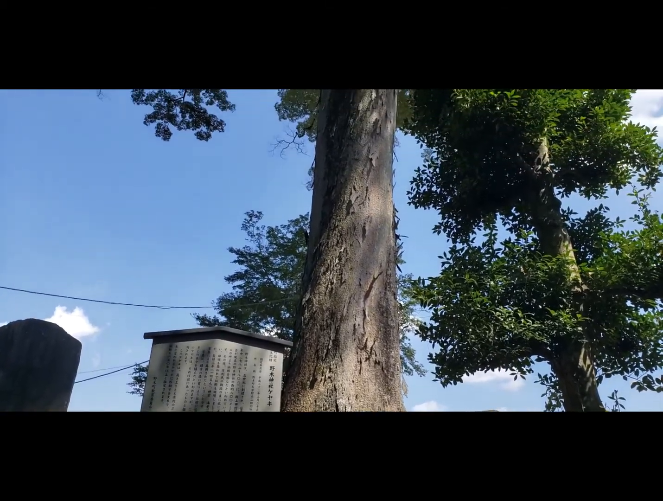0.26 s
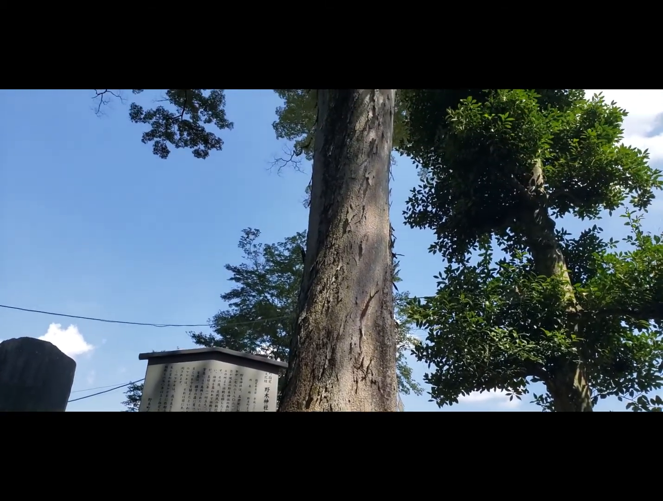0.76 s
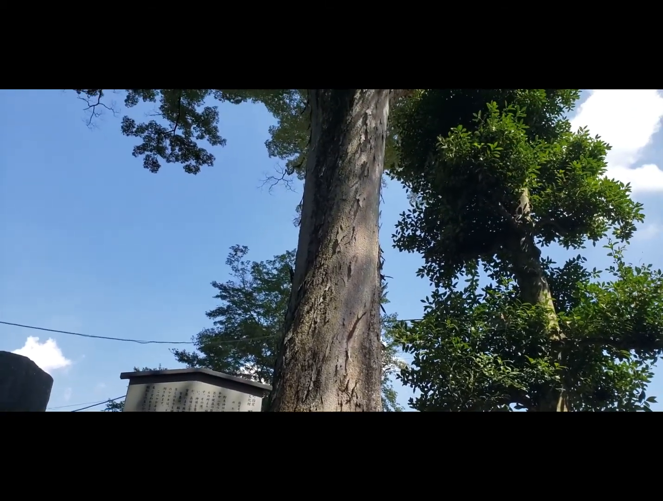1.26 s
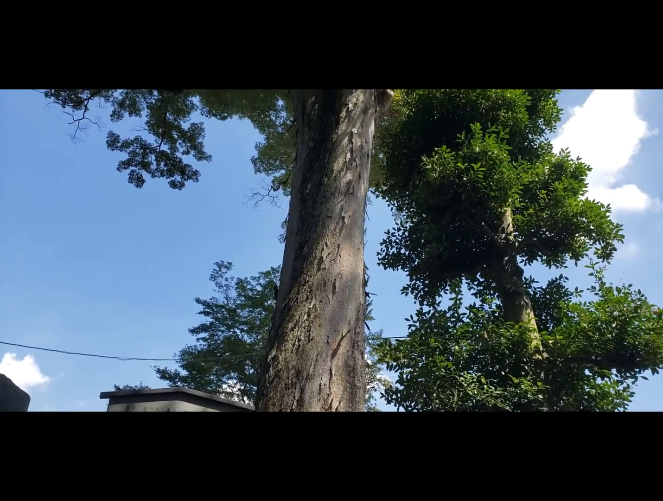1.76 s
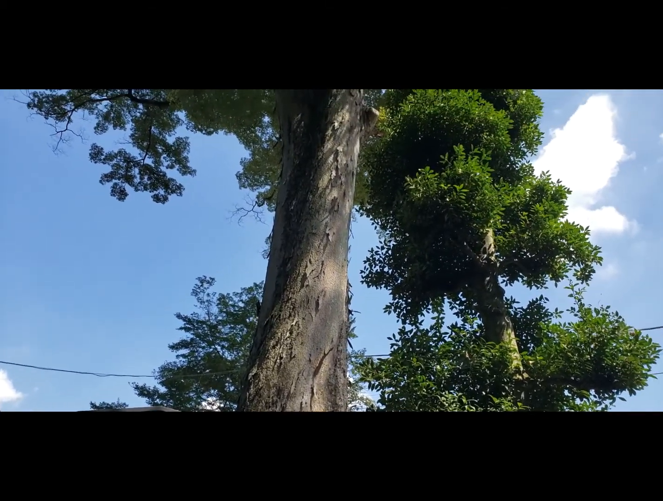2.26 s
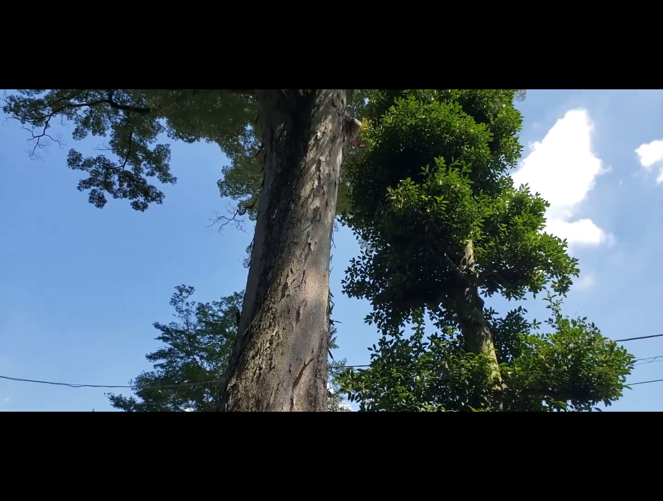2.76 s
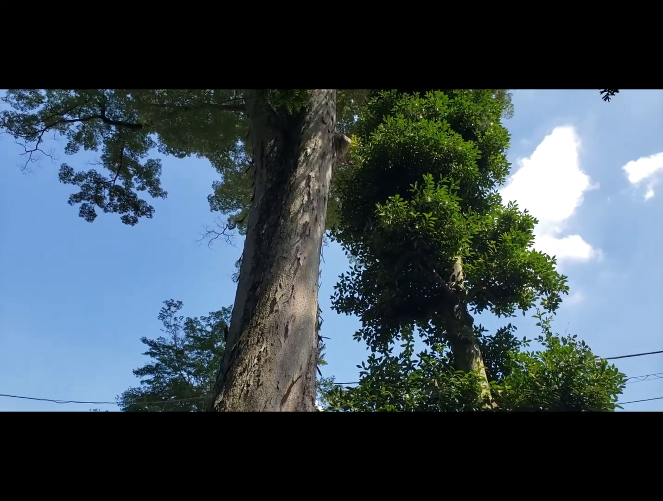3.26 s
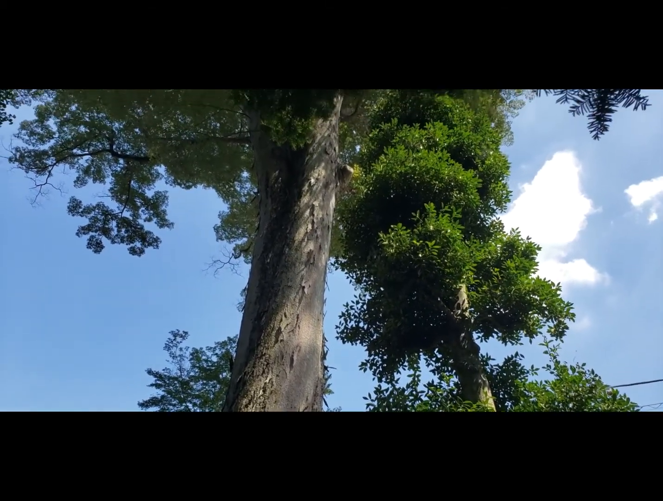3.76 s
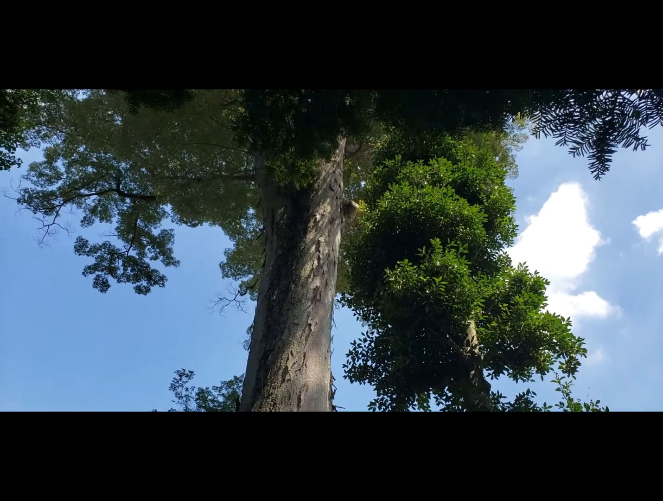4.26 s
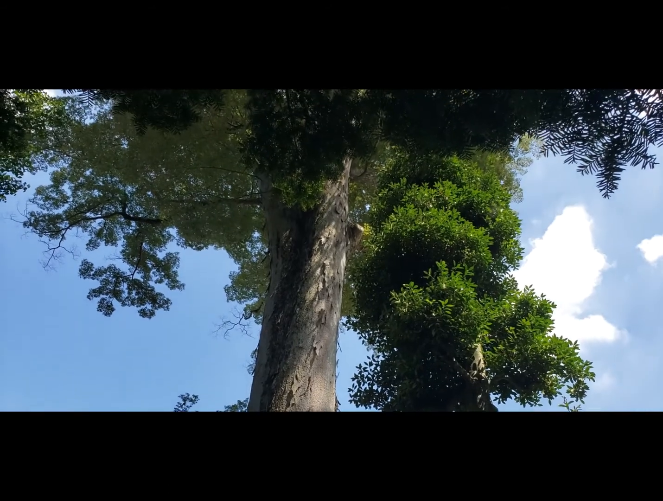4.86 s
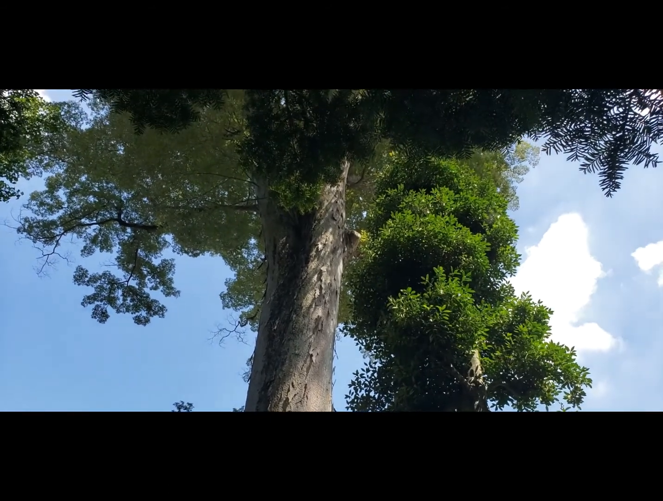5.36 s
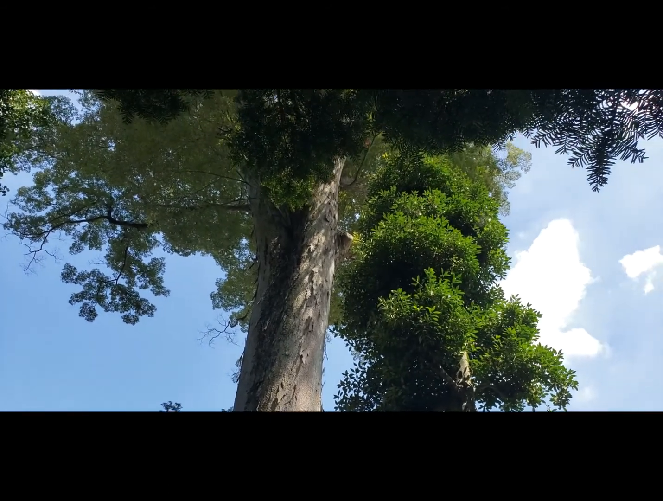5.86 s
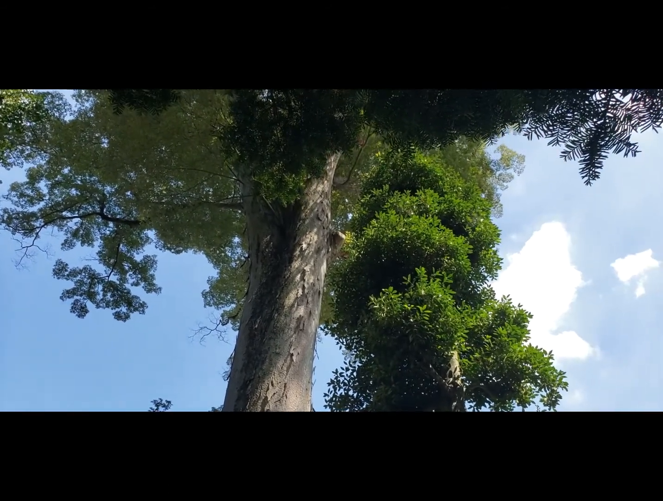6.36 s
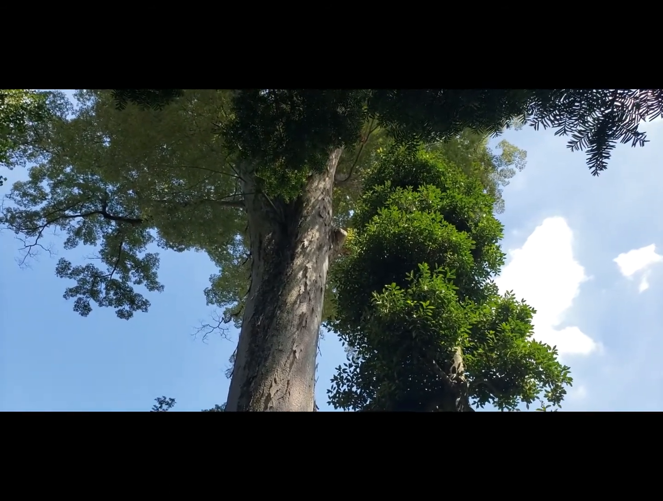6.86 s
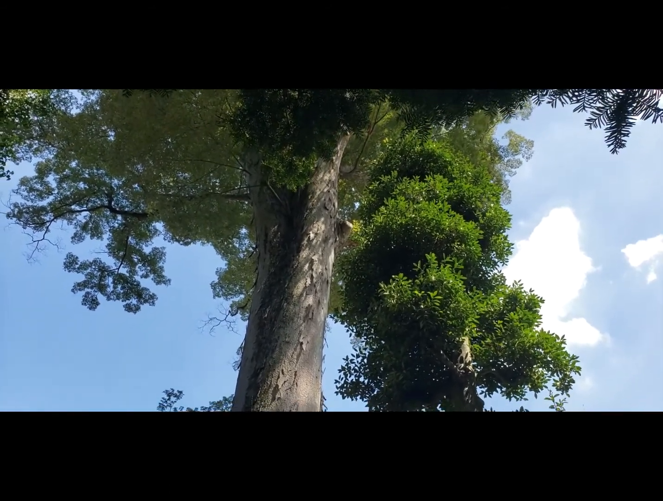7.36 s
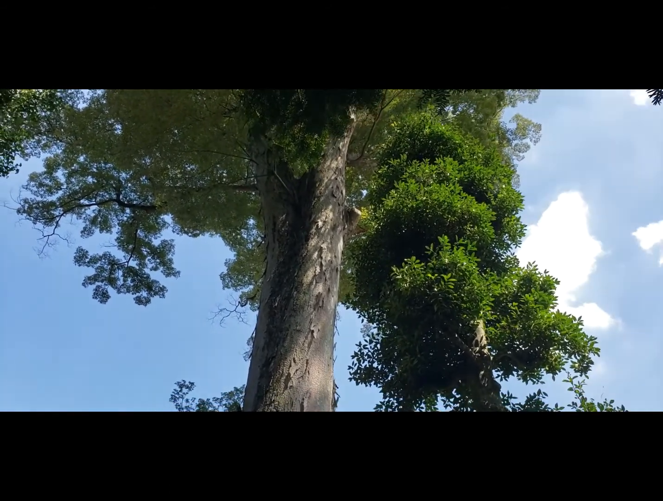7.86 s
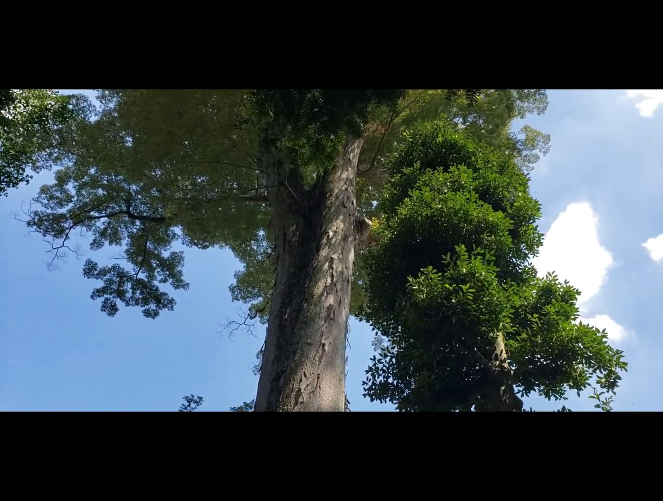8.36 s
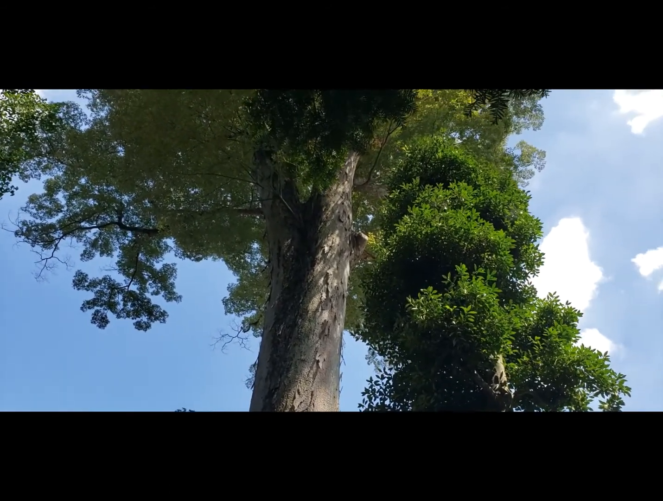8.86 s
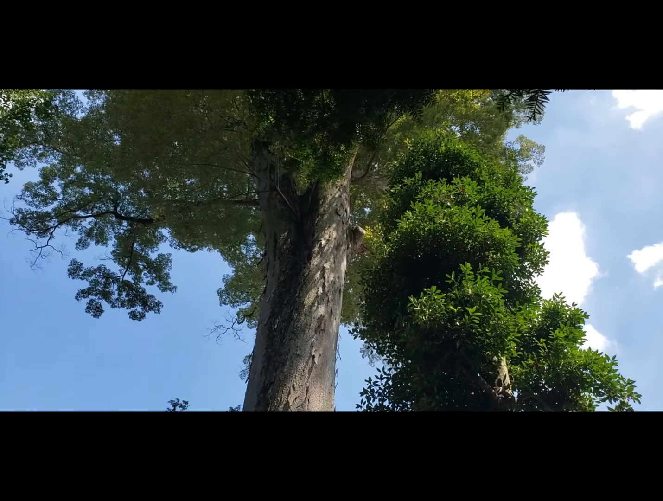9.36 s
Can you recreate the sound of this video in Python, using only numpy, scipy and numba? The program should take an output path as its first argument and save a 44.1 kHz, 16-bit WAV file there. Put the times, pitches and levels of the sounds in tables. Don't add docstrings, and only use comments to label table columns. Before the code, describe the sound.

Outdoors under a tall tree, a steady, bright chorus of countless cicadas surrounds a hand-held phone. High up to the right, one singer starts faintly and builds into a shrill, fast-pulsing buzz. Far away a hammer strikes a steel pipe five times, about once a second, thudding and ringing with echoes. Soft traffic hum and passing cars lie beneath; a light hollow knock and two fainter hammer blows come late.

```python
import sys
import numpy as np
from scipy import signal
from scipy.fft import rfft, irfft
from scipy.io import wavfile
from scipy.ndimage import uniform_filter1d
from numba import njit

SR = 44100
rng = np.random.default_rng(int(sys.argv[2]) if len(sys.argv) > 2 else 0)


def natural_amplitude(level_db):
    exponent = np.asarray(level_db, float) / 20
    return 10 ** exponent


def store_pcm(level_fs):
    pcm = np.round(np.clip(level_fs, -1, 1) * 32767).astype(np.int16)
    wavfile.write(sys.argv[1], SR, np.atleast_2d(pcm).T)


N = 423360
T = np.arange(N) / SR
F = np.fft.rfftfreq(N, 1 / SR)


def unit(x):
    return x / np.sqrt(np.mean(x ** 2))


def curves(table):
    s, *columns = np.transpose(table)
    return [np.interp(T, s, column) for column in columns]


def between(ends, share):
    return ends[0] + (ends[1] - ends[0]) * share


def walk(rate):
    hold = int(SR / rate)
    held = np.repeat(rng.standard_normal(N // hold + 1), hold)
    return 1.46 * uniform_filter1d(uniform_filter1d(held, hold), hold)[:N]


def within(x, lo_hz, hi_hz):
    return signal.sosfilt(signal.butter(6, [lo_hz, hi_hz], "band", fs=SR, output="sos"), x)


@njit
def svf(x, hz, width):
    y, band, low = np.empty(len(x)), 0., 0.
    for i in range(len(x)):
        g, damping = np.tan(np.pi * hz[i] / SR), width / hz[i]
        v = (band + g * (x[i] - low)) / (1 + g * (g + damping))
        band, low, y[i] = 2 * v - band, low + 2 * g * v, damping * v
    return y


def steep(x, hz, width_hz):
    hz = np.clip(hz + 0 * T, 20, .42 * SR)
    return svf(svf(x, hz, 1. * width_hz), hz, 1. * width_hz)


def ports(x, lag, pan_db=0):
    late = irfft(rfft(x) * np.exp(-2j * np.pi * F * lag / SR), N)
    return np.array([late * natural_amplitude(pan_db / 2), x * natural_amplitude(-pan_db / 2)])


def diffuse(size):
    spacing_m, sound_m_per_s = 0.157, 343
    like = .93 * np.sinc(2 * np.fft.rfftfreq(size, 1 / SR) * spacing_m / sound_m_per_s)
    mid, side = rfft(rng.standard_normal((2, size)))
    return np.sqrt((1 + like) / 2) * mid + np.sqrt((1 - like) / 2) * side * np.array([[1], [-1]])


def bed(spectrum, swell_db, flicker_db, rate):
    hz, db = np.transpose(spectrum)
    octave = np.log2(np.maximum(F, 1))
    noise = diffuse(N) * natural_amplitude(np.interp(octave, np.log2(hz), db))
    out, swell, spacing = 0, walk(0.78), .4
    for centre in np.arange(np.log2(hz[0]), np.log2(hz[-1]) + spacing, spacing):
        band = irfft(noise * np.clip(1 - abs(octave - centre) / spacing, 0, 1), N)
        out = out + band * natural_amplitude(swell_db * swell + flicker_db * walk(rate))
    return unit(out)


def scatter(x, t60, rise, size):
    t = np.arange(size) / SR
    tail = irfft(diffuse(size), size) * (1 - np.exp(-t / rise)) * natural_amplitude(-60 * t / t60)
    tail = tail / np.sqrt(np.sum(tail ** 2) / 2)
    return signal.fftconvolve(x[None], tail, axes=1)[:, :N]


def far_chorus():
    # pitch_hz, level_db [dB per Hz]
    chorus_spectrum = [(1710, -49), (2900, -42), (3590, -24), (4250, -0.5), (4690, 2.5), (5070, 2),
                       (5340, 5), (5510, 6.5), (6540, -4.5), (7330, -8.5), (8300, -13), (8790, -21),
                       (10000, -25.5), (13000, -47), (22000, -120)]
    level_db = between((-45.5, -49), T / T[-1]) + 1.5
    start_db = -4 * np.exp(-T / .2)
    return bed(chorus_spectrum, swell_db=.5, flicker_db=1.6, rate=16) * natural_amplitude(level_db + start_db)


def canopy():
    # pitch_hz, level_db [dB per Hz]
    canopy_spectrum = [(10000, -11.5), (10700, -4), (11200, 2), (11800, -12.5), (12600, -5), (14000, -3),
                       (15500, -3.5), (16000, -8)]
    level_db = between((-46.5, -50), T / T[-1])
    return bed(canopy_spectrum, swell_db=.4, flicker_db=1.2, rate=17) * natural_amplitude(level_db)


def drone():
    # lower_hz, upper_hz
    group_hz = [
        (1750., 2280),
        (2350., 2850.),
        (3400., 4660),
    ]
    # first_db, last_db
    group_db = [
        (-70.5, -82),
        (-76, -64),
        (-62.5, -65.5),
    ]
    out = 0
    for (lo_hz, hi_hz), ends in zip(group_hz, group_db):
        group = unit(within(irfft(diffuse(N), N), lo_hz, hi_hz))
        patchy_db = 1.5 * walk(2.5) + 2.2 * walk(14)
        out = out + group * natural_amplitude(between(ends, T / T[-1]) + patchy_db)
    return out


def town():
    # pitch_hz, level_db [dB per Hz]
    town_spectrum = [(13, -48), (22, -17), (35, -2), (60, 2.5), (97, -6), (129, -4.5), (188, -16.5),
                     (298, -20), (544, -30), (1640, -33.5), (2440, -30), (3200, -25.5), (4160, -81),
                     (7040, -120)]
    # time_s, level_db
    flow = [(0, -60), (1.3, -57.5), (2.6, -55.5), (3.3, -57), (3.85, -55), (4.25, -58.5), (4.7, -55),
            (6.2, -55), (7.2, -59), (8.4, -56), (9.6, -61)]
    return bed(town_spectrum, swell_db=.8, flicker_db=2.2, rate=5) * natural_amplitude(curves(flow)[0] + 2.5)


def rumble():
    # peak_s, level_db, span_s [time to lose 10 dB]
    rumble_swells = [
        (1.6, -68, .9),
        (2.6, -70, .7),
        (4.62, -60, .15),
        (6.6, -67, .6),
        (8.6, -73, .2),
    ]
    near = sum(natural_amplitude(db - 10 * abs(T - s) / span_s) for s, db, span_s in rumble_swells)
    return unit(within(irfft(diffuse(N), N), 180.0, 378.0)) * near * natural_amplitude(-9)


def pumping(strength_db, stretch):
    lifts_s = [0.31, 1.052, 1.768, 2.503, 3.243, 4.003, 4.779, 5.554, 6.323, 7.076, 7.823, 8.554, 9.293,
               10.03]
    # time_s, loss_db
    falters = [(1.95, -9), (2.07, -8), (3.56, -5), (3.69, -9), (3.81, -5), (3.875, -12), (4.2, -3),
               (4.267, -13), (4.39, -3), (8.79, -4)]
    turn = np.interp(T, lifts_s, 12 * np.arange(len(lifts_s)))
    top_s = np.interp(np.arange(int(turn[-1]) + 2), turn[turn > 0], T[turn > 0])
    uneven_db = between((3.0, 1.3), np.interp(top_s, T, stretch))
    db = np.interp(top_s, T, strength_db) + uneven_db * rng.standard_normal(len(top_s))
    for at, loss_db in falters:
        db[np.argmin(abs(top_s - at))] = np.interp(at, T, strength_db) + loss_db
    side = turn - np.round(turn)
    lift = np.exp(-.5 * (side / np.where(side < 0, .18, .11)) ** 2) * (T > lifts_s[0])
    return lift, uniform_filter1d(db[np.round(turn).astype(int)], size=500)


def clicks(rate, jitter, scatter_db, weak_db):
    turns = np.cumsum(rate) / SR
    k = np.arange(1, int(turns[-1]) - 1)
    chance = rng.standard_normal((len(k), 2))
    at = np.interp(k + jitter * chance[:, 0], turns, np.arange(N))
    size = (-1.) ** k * natural_amplitude(scatter_db * chance[:, 1] + weak_db * (k % 2))
    near = at.astype(int)[:, None] + np.arange(-8, 9)
    gap = near - at[:, None]
    out = np.zeros(N + 16)
    np.add.at(out, near.clip(0), size[:, None] * np.sinc(gap) * np.cos(np.pi * gap / 18) ** 2)
    return out[:N]


def cicada():
    # time_s, lift_db, belly_db, stretch [0-1]
    song = [(0, -52, -60, 0), (0.8, -48.5, -53, .05), (1.7, -44, -47, .13), (2.4, -39, -46, .26),
            (3.1, -43, -46, .4), (3.7, -33, -46, .6), (4.3, -32, -46, .78), (4.6, -28.5, -42, .84),
            (5.15, -26.5, -41.5, .87), (5.8, -30, -40, .9), (6.2, -31, -39, .93), (6.6, -28, -37.5, .95),
            (6.9, -29.5, -39, .98), (7.4, -29, -38, 1), (8.05, -35, -36.5, 1), (8.6, -24.5, -37.5, 1),
            (8.92, -23, -38, 1), (9.35, -30, -40.5, 1)]
    # time_s, rate_hz
    click_rate = [(0, 391), (3, 393), (5.3, 392), (5.9, 389), (6.5, 383), (7.5, 385.3), (8, 386.5),
                  (9.6, 386.8)]
    rest_hz, belly_hz = 11200, 5450
    strength_db, belly_db, stretch = curves(song)
    half_db = between((-80, -50), stretch)
    leaf_db = between((-52, -37.5), stretch)
    pan_db = between((-4, -4.5), stretch)
    reach_hz = between((11600, 14850), stretch)
    lift, peak_db = pumping(strength_db, stretch)

    top_hz = reach_hz + 80 * (peak_db - uniform_filter1d(peak_db, SR // 2))
    hz = rest_hz + (top_hz - rest_hz) * lift ** .6
    pace = curves(click_rate)[0] * (1 + .03 * lift ** 2)
    train = clicks(pace, jitter=.004, scatter_db=2.0, weak_db=-.8)
    ribs = clicks(pace, jitter=.02, scatter_db=1.0, weak_db=-0.5)
    ribs = ribs + 0.22 * clicks(pace, jitter=.3, scatter_db=3.0, weak_db=-1)

    shrill = unit(steep(ribs, hz, 3200)) + .5 * unit(steep(ribs, hz - 1300, 1800))
    shrill = within(shrill, 10900., 17000.)
    half = unit(steep(ribs, 0.518 * hz, 1150)) * natural_amplitude(half_db) * lift
    belly = unit(within(steep(train, belly_hz, 1700), 4600., 5950.))
    belly = belly * natural_amplitude(belly_db + 1.5) * (1 - .95 * lift ** .35)
    burst = shrill * natural_amplitude(peak_db - 3.0) * lift ** 1.2
    leaves = shrill * (0.5 + lift) * natural_amplitude(leaf_db)

    twigs = scatter(burst + half + .4 * belly, t60=.03, rise=.0005, size=4096) * natural_amplitude(-10.0)
    crown = scatter(leaves + 0.91 * half + 0.36 * belly, t60=0.15, rise=0.0027, size=16384)
    high = ports(.8 * burst + .3 * leaves, lag=18.9, pan_db=pan_db)
    low = ports(.8 * (half + belly), lag=16.5, pan_db=.6)
    return high + low + twigs + crown


def modes(table, size):
    t = np.arange(size) / SR
    ring = sum(natural_amplitude(db - 60 * t / t60) * np.sin(2 * np.pi * hz * t) for hz, db, t60 in table)
    return ring / abs(ring).max()


def hammer():
    # start_s, thud_db, ring_db [re thud], boom_db [re thud]
    blows = [
        (0.33, -42, -23.5, -5),
        (1.345, -32.5, -22, -7),
        (2.366, -31, -21.5, -11.5),
        (3.372, -30.5, -21.5, -6.5),
        (4.45, -32, -24, -10),
        (8.46, -44.5, -25, -13),
        (9.5, -42.5, -26, -8),
    ]
    # pitch_hz, level_db, t60_s
    post_modes = [(191.5, -15, 0.25), (222, -1, 0.1), (336.6, -2, 0.16), (372, 0, 0.11), (453, -9.5, 0.1),
                  (830, -11.5, 0.065), (930, -17.5, 0.091), (1077.3, -15.5, 0.074), (1150, -6, 0.061),
                  (1230, -16, 0.27), (1441, -23.5, 0.12), (2290, -18, 0.02)]
    pipe_modes = [(2384, -9, .35), (2393, -19, .5), (2838, 0, .3), (2846, -8, .6), (2966, -20, .3),
                  (3185, -6, .25), (3330, -15, .12)]
    ground_modes = [(62, -27, 0.18), (85.7, -3, 0.5), (109, -4, 0.13), (141, -3.5, 0.12), (166, -10, 0.047)]
    body, pipe = np.zeros((2, N + 2 * SR))
    thud, ring, boom = (modes(table, size=SR) for table in (post_modes, pipe_modes, ground_modes))
    ring = ring * (1 - np.exp(-(T[:SR] / .011) ** 2))
    for s, db, ring_db, boom_db in blows:
        crack = within(rng.standard_normal(SR), 228.0, 3230.0) * natural_amplitude(-1.5 - 60 * T[:SR] / 0.038)
        blow = natural_amplitude(db) * (natural_amplitude(3.5) * thud + crack + natural_amplitude(boom_db) * boom)
        body[int(s * SR):][:SR] += blow
        body[int((s - .018) * SR):][:SR] += blow * natural_amplitude(-17)
        pipe[int(s * SR):][:SR] += natural_amplitude(db + ring_db) * ring
        pipe[int((s + .095) * SR):][:SR] += natural_amplitude(db + ring_db + 1.5) * ring
    body, pipe = body[:N], pipe[:N]
    near = scatter(body, t60=0.49, rise=.012, size=16384)[0] * natural_amplitude(9.5) + pipe * natural_amplitude(30.5)
    yard = scatter(body + natural_amplitude(16.5) * pipe, t60=0.55, rise=0.0067, size=32768) * natural_amplitude(6.5)
    return ports(near, lag=7.1) + yard


def engines():
    # time_s, pitch_hz, level_db
    first_car = [(0.4, 162, -68), (1.1, 162, -59), (1.6, 161.3, -54), (2.4, 160.5, -64)]
    second_car = [(3.5, 100, -64), (4.4, 116, -60), (4.96, 125, -58), (5.6, 131, -57), (6.06, 131, -58),
                  (6.35, 125.5, -53), (6.84, 116.5, -58), (7.1, 113, -75)]
    third_car = [(7.8, 55.6, -66), (8.1, 56.6, -48), (8.75, 59, -54), (9.3, 60.3, -68)]
    out = 0
    for car in (first_car, second_car, third_car):
        hz, db = curves(car)
        fade = np.clip(np.minimum(T - car[0][0], car[-1][0] - T) / 0.26, 0, 1)
        tone = np.sin(2 * np.pi * np.cumsum(hz) / SR)
        out = out + fade * natural_amplitude(db + 0.83 * walk(6)) * tone
    return out


def knock():
    start_s, pitch_hz, level_db, t60_s = 7.728, 742, -56, .5
    t = (T - start_s).clip(0)
    return natural_amplitude(level_db - 60 * t / t60_s) * np.sin(2 * np.pi * pitch_hz * t) * (1 - np.exp(-t / .003))


def scene():
    around = far_chorus() + canopy() + drone() + town() + rumble()
    return around + cicada() + hammer() + engines() + knock()


def top_cut(x):
    return signal.sosfilt(signal.butter(12, 16460, fs=SR, output="sos"), x)


def record(dry):
    # pitch_hz, level_db
    left_port = [(100, 1), (200, -2), (600, -2.5), (1200, 0.5)]
    hz, db = np.transpose(left_port)
    colour = natural_amplitude(np.interp(np.log(F + 1), np.log(hz), db))
    dry = np.array([irfft(rfft(dry[0]) * colour, N), dry[1]])
    dry = signal.sosfilt(signal.ellip(10, .2, 70, 15560, fs=SR, output="sos"), dry)
    dry = signal.sosfilt(signal.butter(2, 36., "high", fs=SR, output="sos"), dry)
    return top_cut(dry)


dry = scene()
out = record(dry)
store_pcm(out)
```